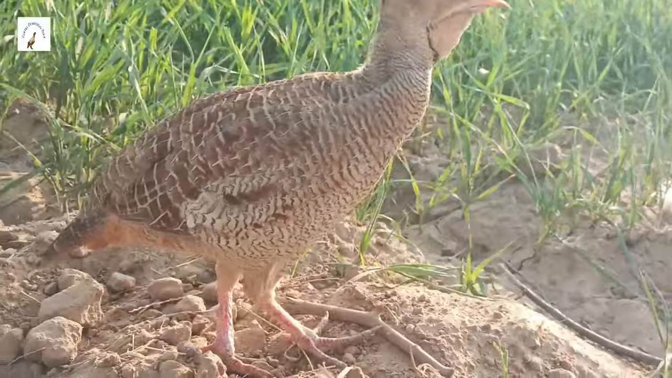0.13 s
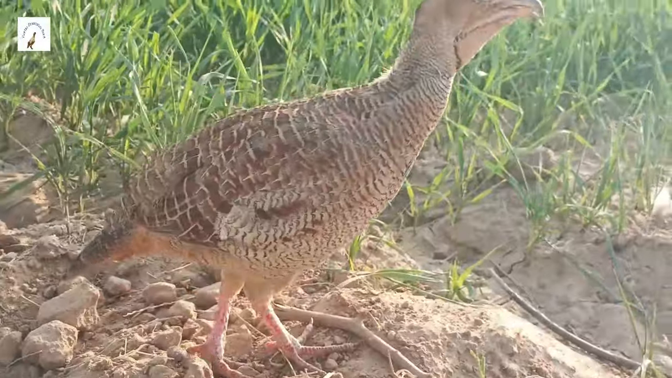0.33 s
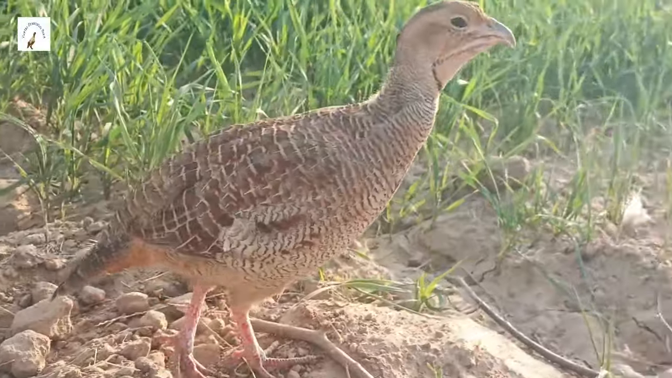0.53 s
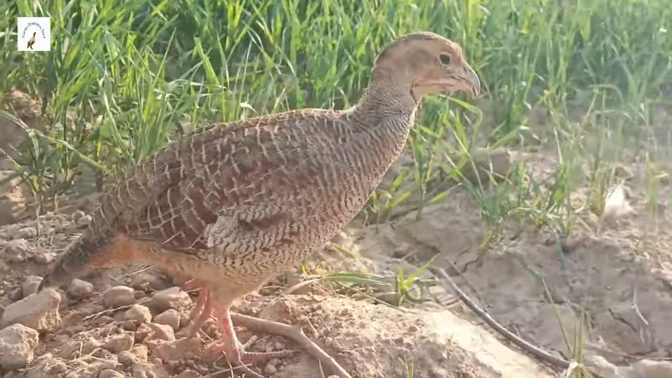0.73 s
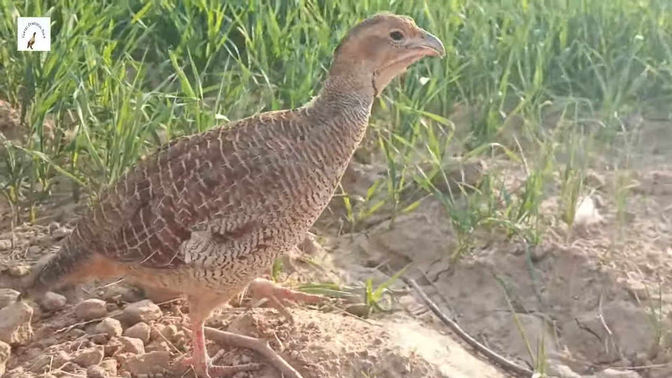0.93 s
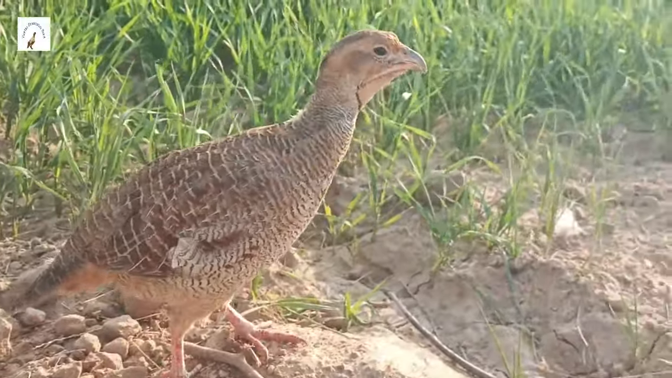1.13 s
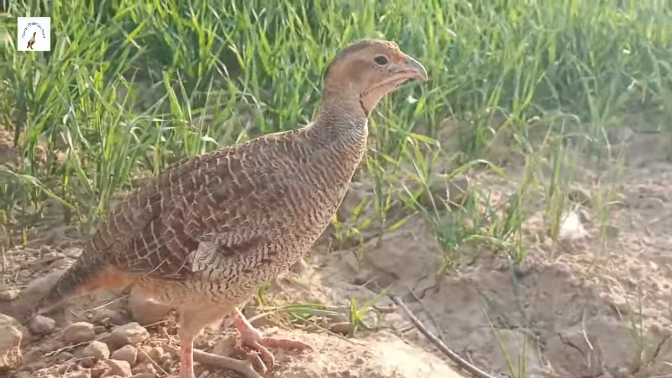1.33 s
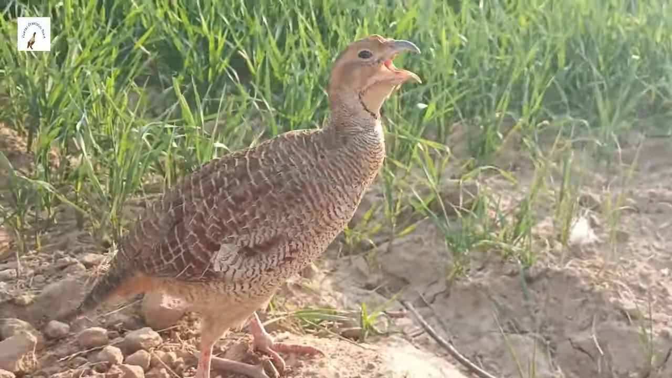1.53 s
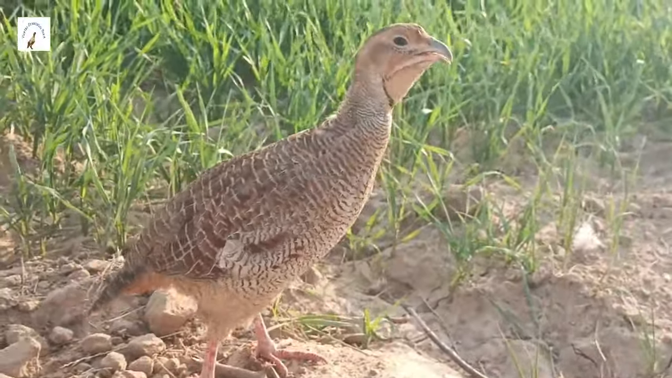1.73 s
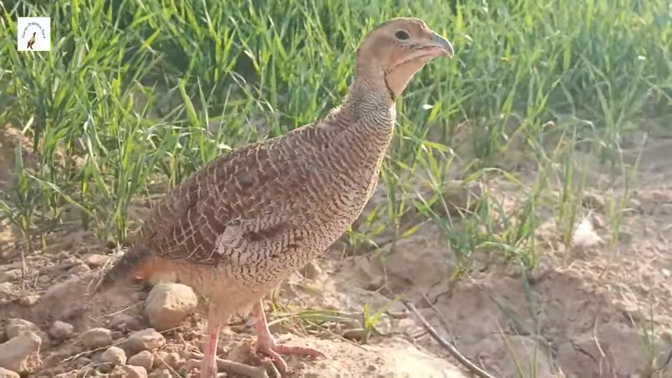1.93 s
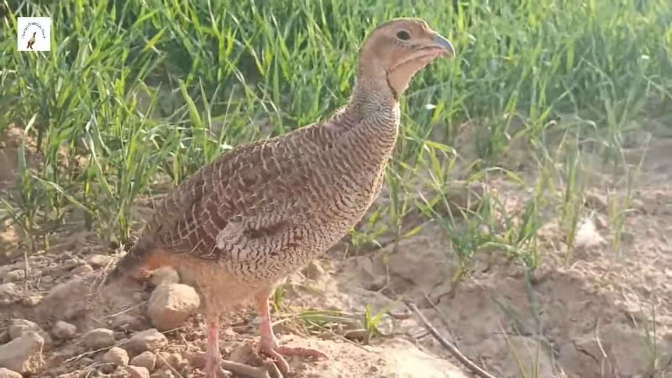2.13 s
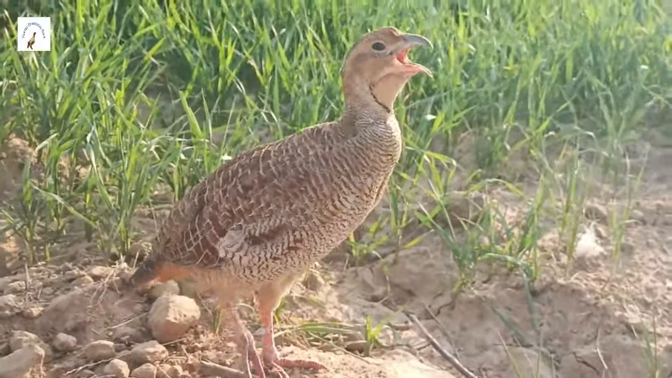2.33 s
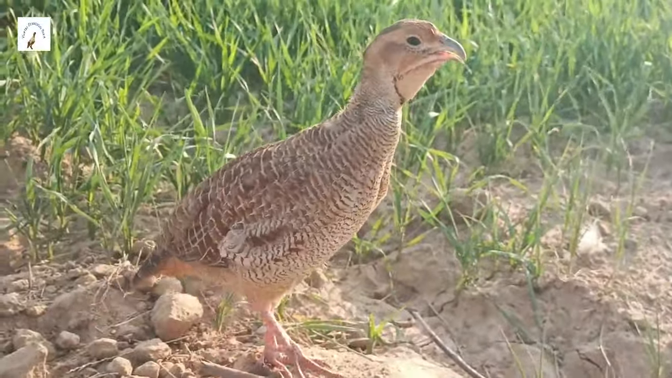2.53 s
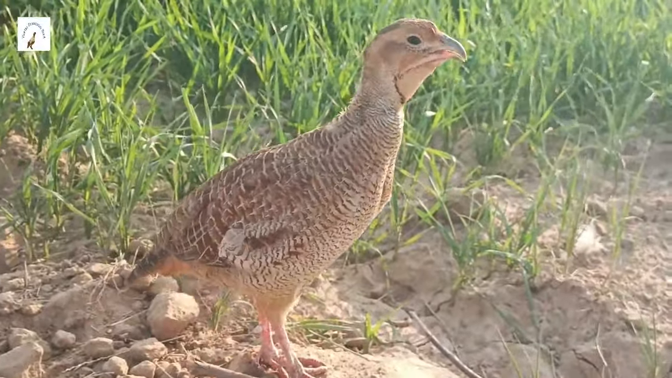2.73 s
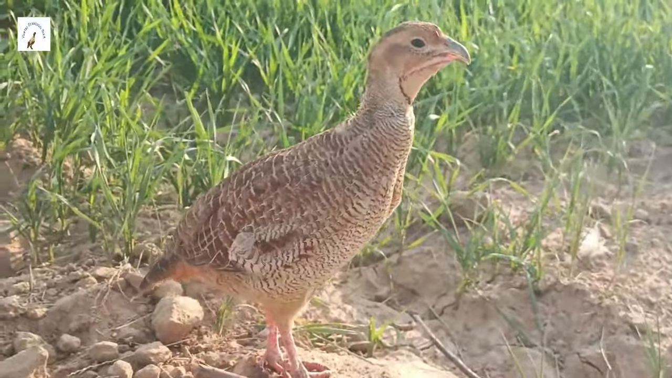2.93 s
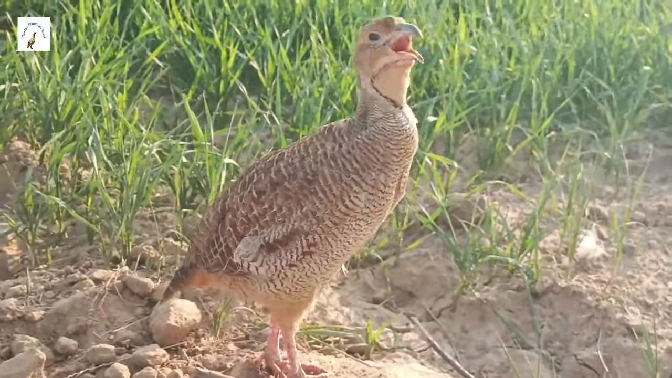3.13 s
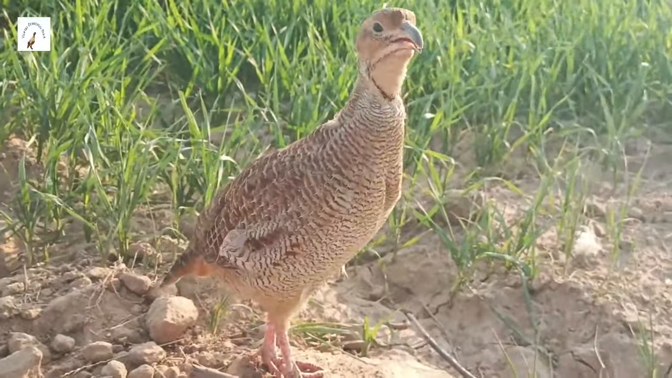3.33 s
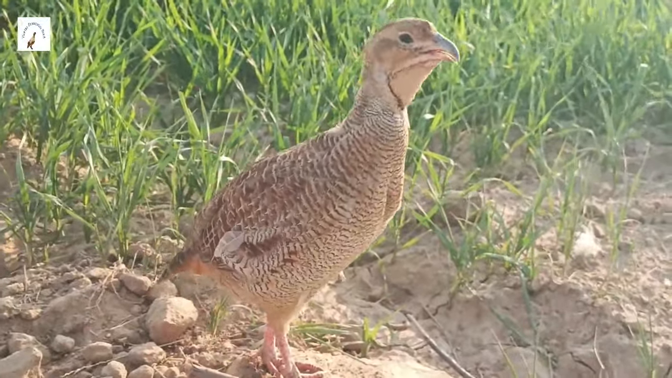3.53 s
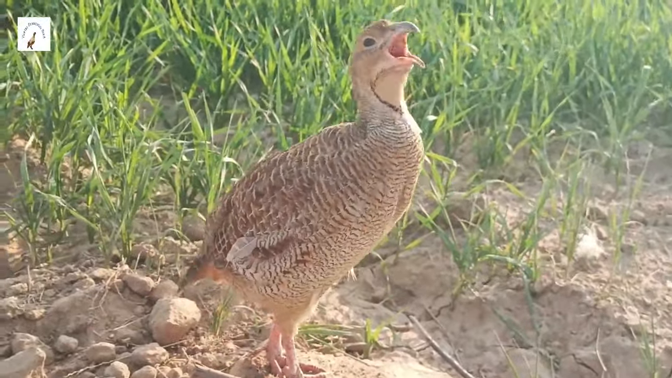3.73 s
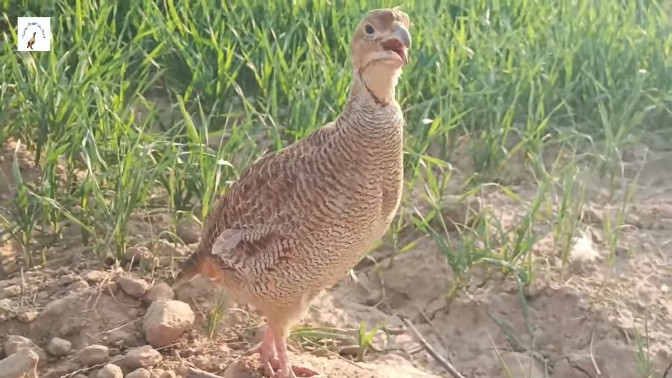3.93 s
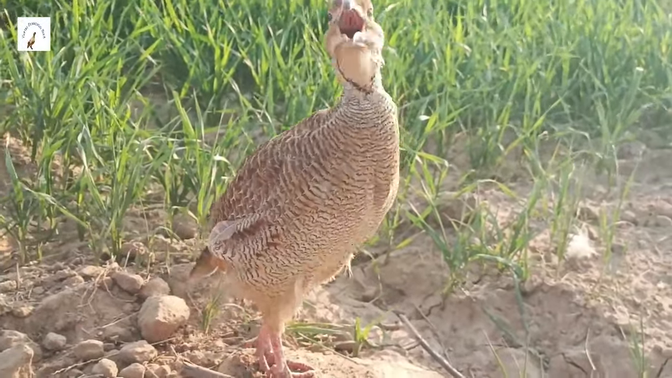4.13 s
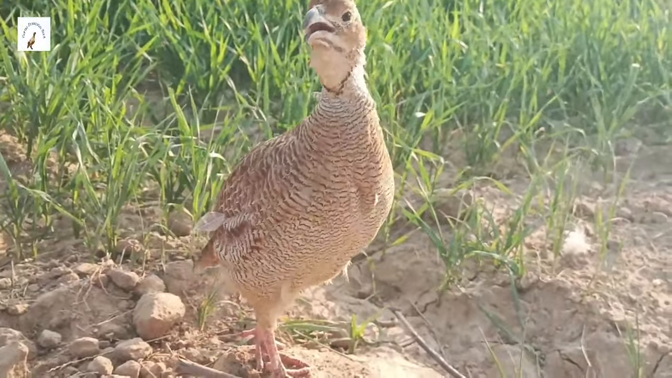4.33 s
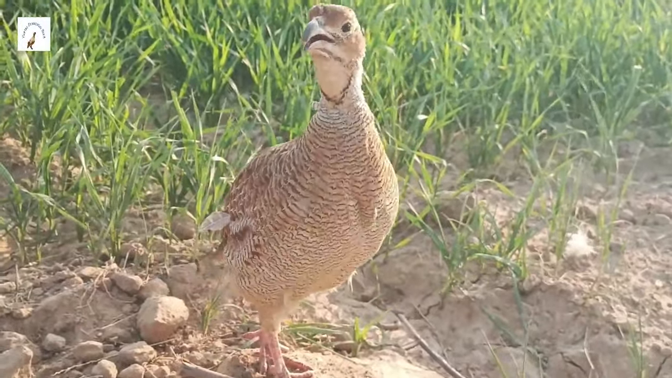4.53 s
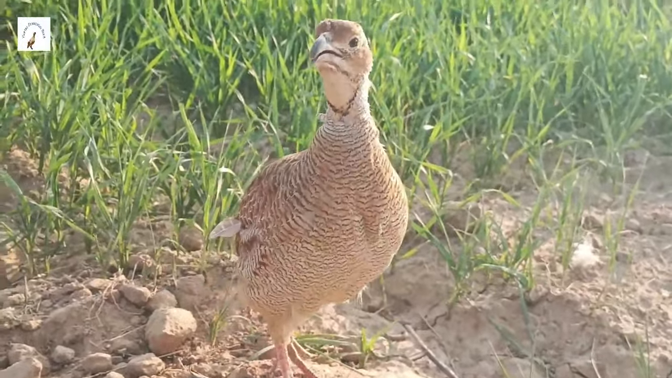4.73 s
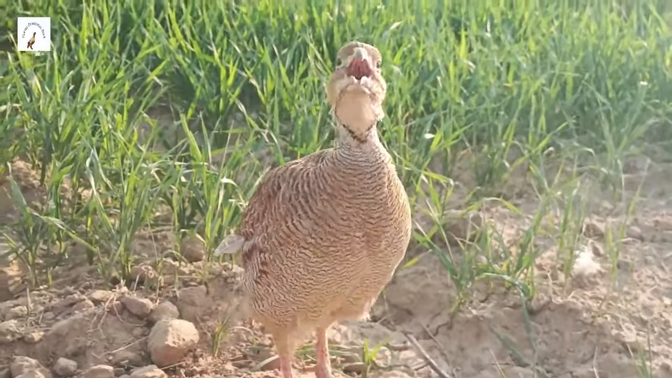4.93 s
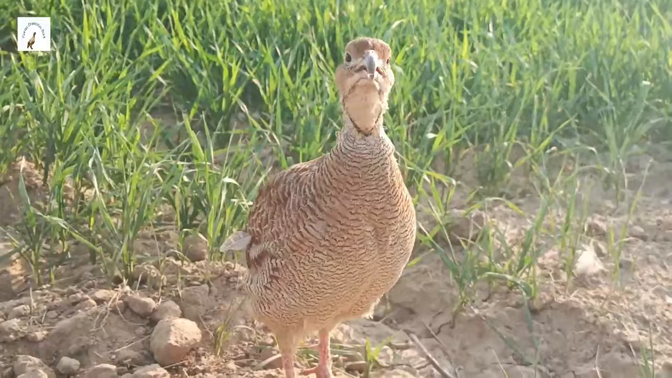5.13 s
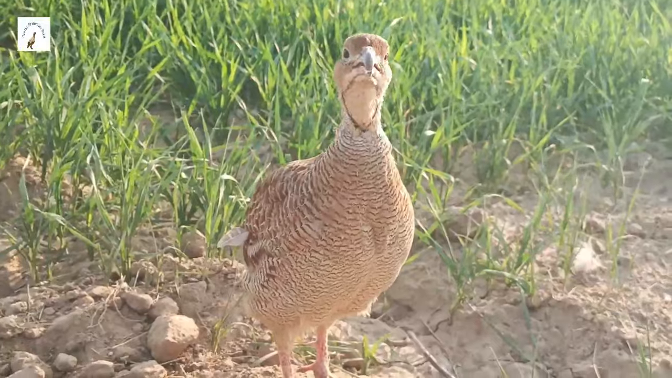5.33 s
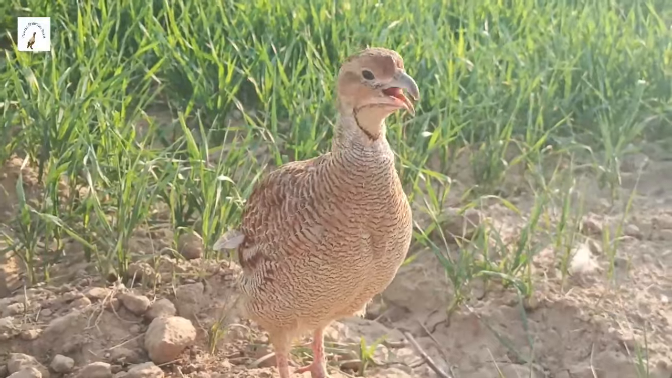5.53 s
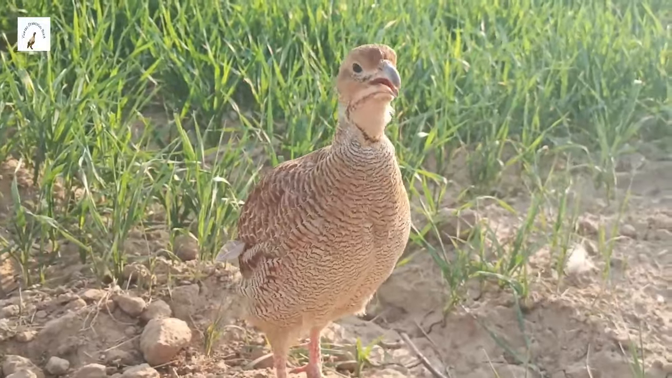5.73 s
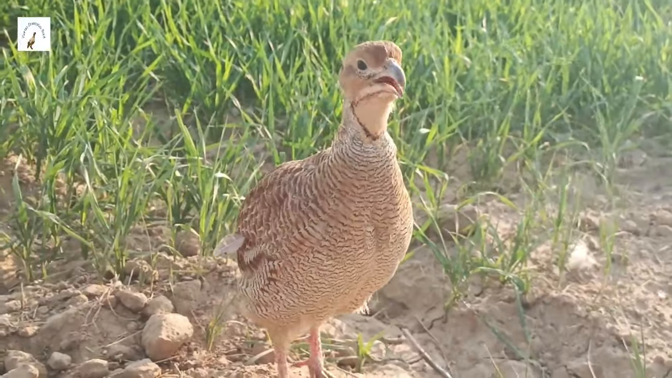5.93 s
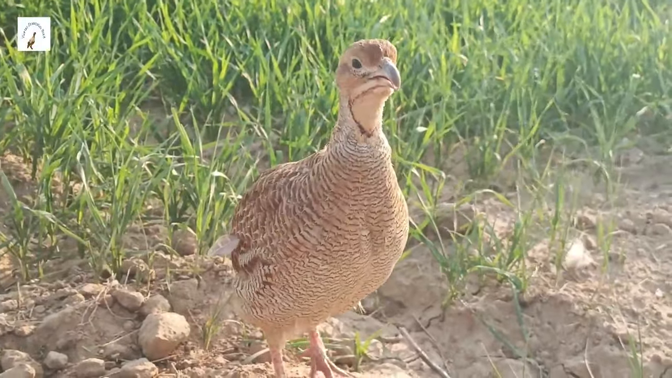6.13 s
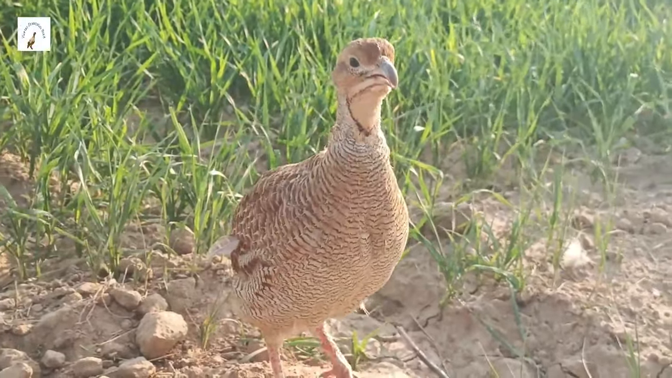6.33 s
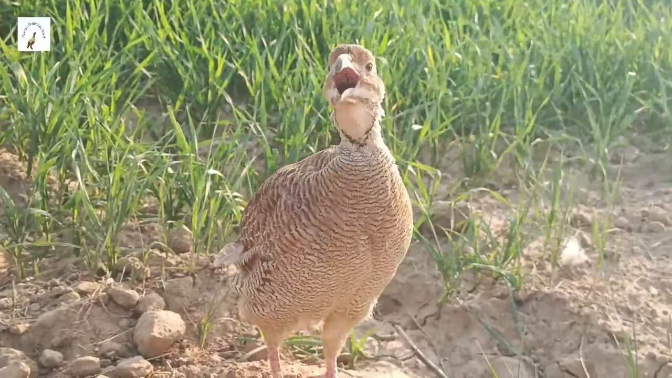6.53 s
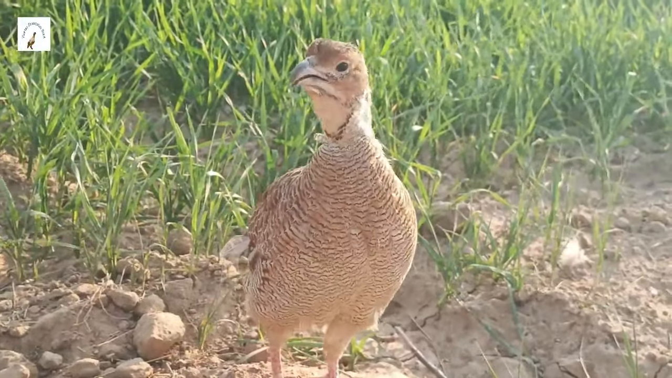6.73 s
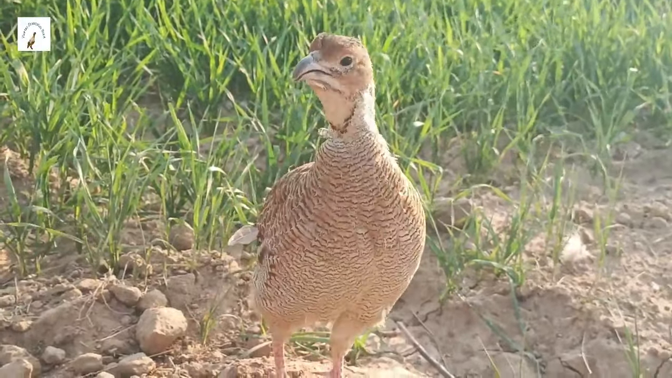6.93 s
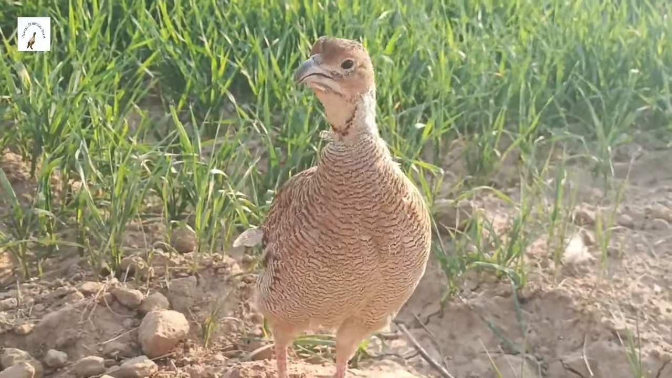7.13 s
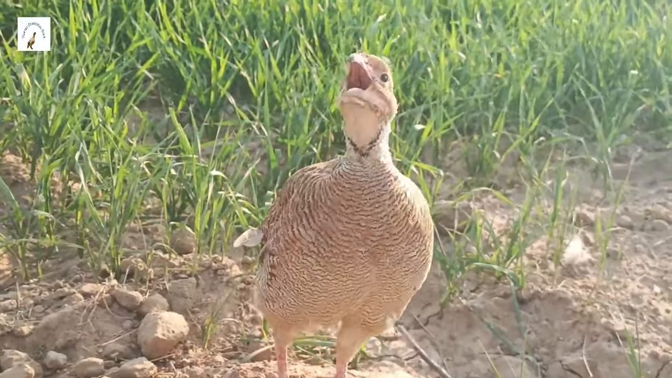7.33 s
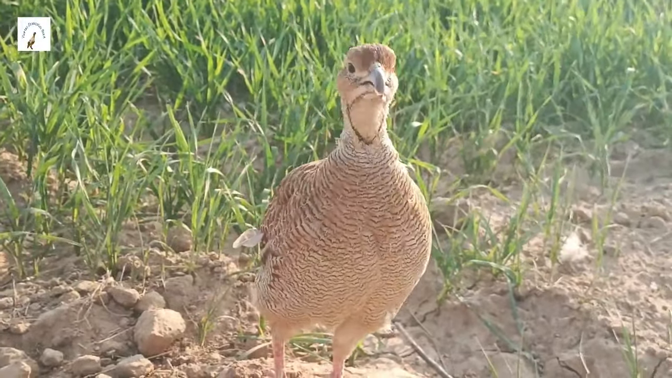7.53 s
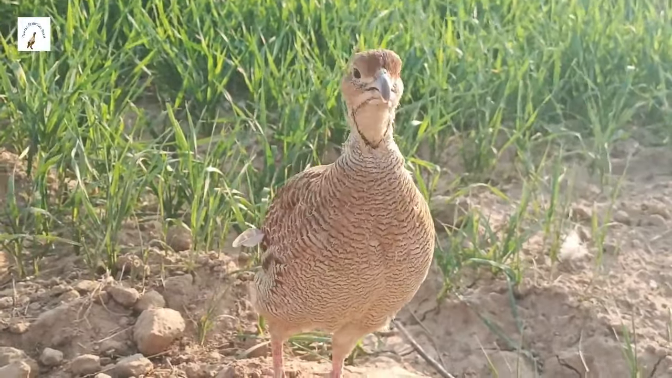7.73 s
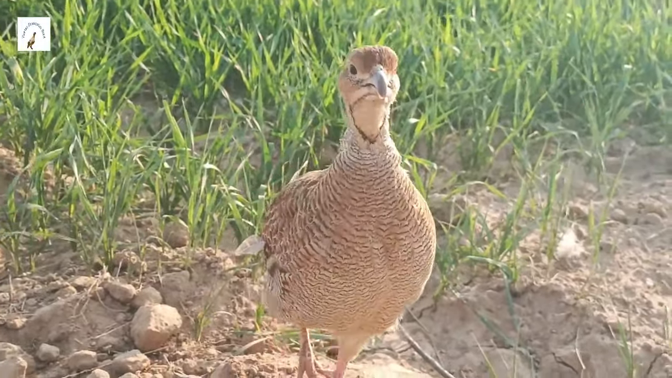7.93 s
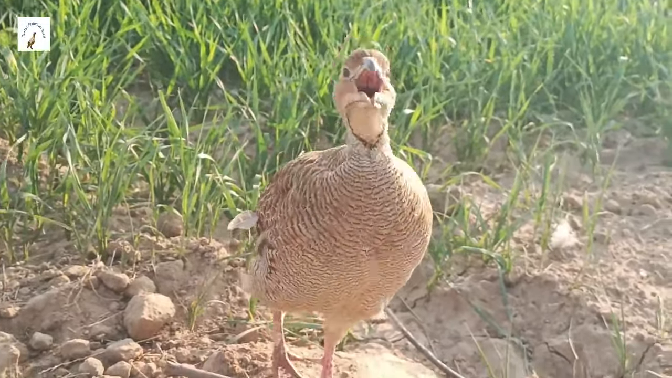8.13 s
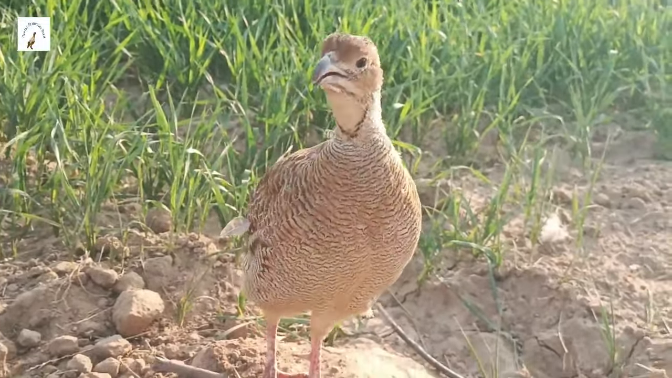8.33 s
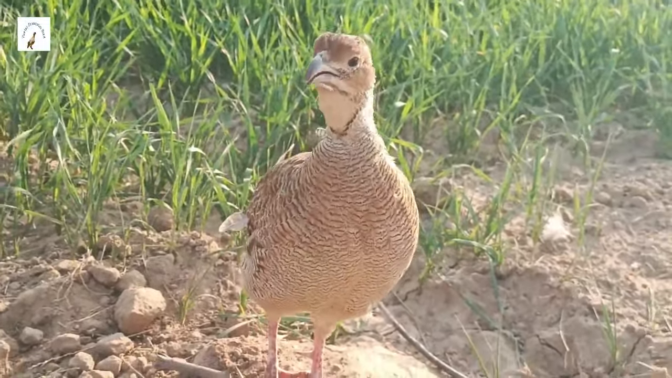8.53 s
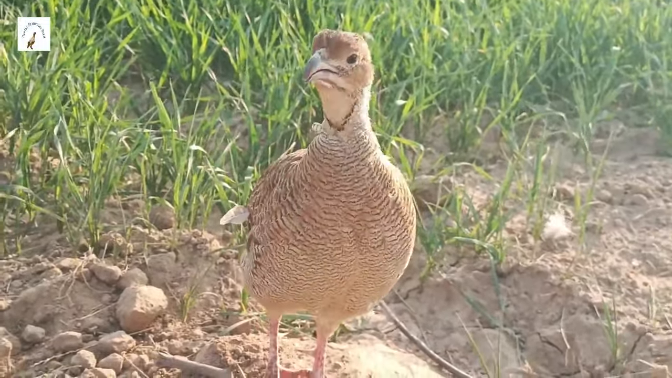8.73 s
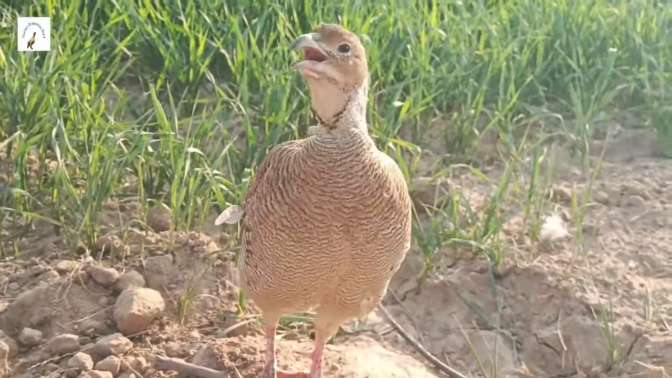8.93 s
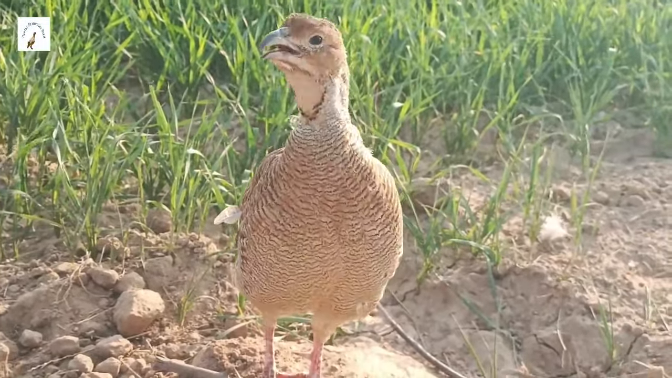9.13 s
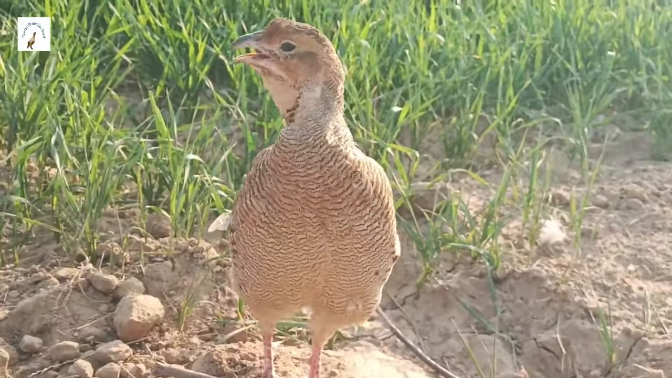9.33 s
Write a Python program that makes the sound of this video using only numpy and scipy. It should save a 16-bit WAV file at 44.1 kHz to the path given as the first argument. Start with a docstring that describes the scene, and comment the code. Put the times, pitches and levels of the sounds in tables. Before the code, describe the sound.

A near-instant of silence, then quiet open air with light low wind. At 0.1 s a brief whistle blip and rasp lead into a pip, a falling note and three hoarse clucks by 0.6 s. From 0.7 s the duet settles: a high, nearly pure whistle scoops up, sags and flicks upward, while a rougher bird gives rasp, pip, falling note and clucks. Cycles begin near 0.7, 1.4, 2.2 and 3.0 s, the falling notes turning clearer. Around 3.8 to 4.6 s the pattern tightens, with an extra cluck and a second rasping phrase. Further rounds start near 4.8, 5.6, 6.4, 7.3 and 8.1 s. Wind bumps come mainly from 2 to 3.6 s, with a stronger thump at 4.6 s; barely audible distant notes occur near 0.6 and 4.7 s. At 8.9 s a last whistle meets rasps, falling notes and a final pip near 9.3 s. Close and dry, with faint field reflections.

```python
"""After a very short silence, light wind is heard on open ground and one francolin whistles, high and nearly pure.
A second bird answers with a rasp, a pip and a falling note, then hoarse clucks, and the duet goes on.
Soon gusts, thumps and two faint distant notes join in, and the far field edge sends back a faint echo.
The whistle and clear notes are bending sine waves; rasps and clucks are uneven pulses ringing resonances.
Wind is coloured noise, thumps are short low waves, and the echo is a burst of noise used as a filter."""
import sys
import numpy as np
from scipy import signal
from scipy.fft import rfft, irfft
from scipy.io import wavfile
from scipy.ndimage import uniform_filter1d

SR = 44100
rng = np.random.default_rng(int(sys.argv[2]) if len(sys.argv) > 2 else 0)


def master(y):
    """Save y as 16-bit WAV."""
    cut = np.clip(np.atleast_2d(y).T, -1, 1)
    pcm = np.round(cut * 32767)  # scale
    wavfile.write(sys.argv[1], SR, pcm.astype(np.int16))


N = 413216

# Gusts: (middle t/s, length/s, level/dB before the lumps)
GUSTS = [(0.625, 0.35, -57.5), (1.299, 0.43, -55.5), (1.928, 0.32, -46.5), (2.257, 0.11, -42.5),
         (2.981, 0.33, -45.5), (3.521, .35, -38.5), (4.68, 0.36, -48.5), (5.5, 0.3, -54.5),
         (7.004, 0.31, -58.5), (8.7, 0.3, -59)]
# Colour of the wind noise: (f/Hz, level/dB)
WIND_COLOUR = [(25, -35), (60, -7.5), (110, -1), (190, -15), (300, -20), (600, -54), (1500, -95.5)]
# Thumps of wind on the microphone: (start t/s, level/dB, f/Hz)
THUMPS = [(1.988, -24.5, 140), (2.259, -31.5, 152), (3.029, -30.5, 115), (3.22, -37.5, 163),
          (3.52, -23.5, 115), (3.56, -23.5, 65), (4.62, -13, 120), (6.888, -35, 80.3), (7.16, -38, 97),
          (8.908, -29, 140)]
# Colour of the quiet air: (f/Hz, level/dB)
AIR_COLOUR = [(250, -18), (317, -3.5), (400, -12.5), (1740, -26), (6000, -42)]
# Faint calls of a distant bird: (t/s, length/s, first base f/Hz, base f/Hz it nears, level/dB)
DISTANT = [(.59, .07, 590, 610, -66), (4.74, .085, 520, 600, -58)]
# Overtones of the distant call: (multiple of the base pitch, level/dB)
DISTANT_OVERTONES = [(2, 0), (3, -5)]
# Clucks: (t/s, length scale/s, growl level/dB, treble trim/dB, windpipe f/Hz at full effort, clear note level/dB)
CLUCKS = [(0.337, 0.056, -11.5, -30.5, 1177, -9.5), (0.437, 0.049, -12.5, -35, 1213, -11),
          (0.544, .04, -19, -34, 1150, -27.5), (1.066, 0.053, -12.5, -32, 1252, -13),
          (1.167, 0.055, -12, -34, 1302, -12), (1.286, 0.029, -29.5, -45, 1160, -36.5),
          (1.781, 0.057, -10, -29, 1304, -7.5), (1.889, 0.055, -11, -32.5, 1305, -12),
          (2.01, 0.038, -26, -36, 1200, -27), (2.583, 0.059, -11, -26, 1394, -9.5),
          (2.688, 0.058, -11.5, -31, 1295, -11.5), (2.806, 0.047, -19, -34.5, 1240, -21.5),
          (3.375, 0.06, -11, -23.5, 1474, -10.5), (3.49, 0.057, -10, -28, 1281, -12),
          (3.611, 0.048, -12, -32.5, 1426, -16.5), (4.028, 0.046, -11.5, -11, 1543, -8.5),
          (4.4, 0.058, -10.5, -15.5, 1522, -7.5), (4.516, 0.057, -12, -17, 1440, -10.5),
          (4.636, 0.052, -10, -24, 1426, -28), (5.181, 0.058, -10.5, -17.5, 1467, -7.5),
          (5.295, .055, -9.5, -23, 1367, -16), (5.414, 0.052, -14.5, -32.5, 1245, -20.5),
          (5.922, .056, -12, -19.5, 1453, -9), (6.033, 0.053, -11.5, -21.5, 1312, -10.5),
          (6.153, 0.042, -14.5, -32.5, 1304, -19), (6.798, 0.056, -11, -20, 1347, -9.5),
          (6.909, 0.051, -9.5, -25.5, 1467, -19), (7.029, 0.043, -26.5, -41.5, 1205, -33),
          (7.642, 0.052, -12, -20, 1340, -9.5), (7.746, .055, -11.5, -26, 1330, -12.5),
          (7.869, 0.043, -21, -38, 1266, -27), (8.467, .057, -10.5, -19.5, 1377, -9),
          (8.578, 0.055, -11, -24.5, 1293, -10), (8.696, .049, -12, -29, 1355, -17)]
# Resonances of a cluck: (multiple of the windpipe pitch, added f/Hz, basic width/Hz, level/dB)
# The first four are the bass group, the rest the treble group.
PIPE = [(.26, 0, 220, -4.5), (1.0, 0, 380, 22.5), (0, 2800, 330, 9), (1.5, 0, 1100, -3), (0, 4100, 300, -3),
        (0, 5500, 260, -1), (0, 4300, 3200, -16), (0, 9300, 4000, -27)]
# Colour the beak gives to the clucks: (f/Hz, level/dB)
CLUCK_BEAK = [(120, -30), (300, -2), (700, -4), (1300, 0), (2000, 0), (3400, 4), (4800, -1), (5800, 4),
              (6500, -10), (9000, -2), (16000, 8)]
# Colour of the open beak in harsh sounds: (f/Hz, level/dB)
OPEN_BEAK = [(200, -38), (1000, -19), (1500, -14), (2100, -6.5), (2350, -13), (2750, -4), (3300, -1),
             (4000, -16), (4600, -12), (5600, -8), (6200, -20), (7200, -38), (8200, -25), (10500, -24.5),
             (16000, -41)]
# Colour of the beak in clear notes: (f/Hz, level/dB)
SUNG_BEAK = [(900, -1), (2000, 2.5), (3900, -1), (5900, -1), (6700, -14), (7600, -25), (9600, -19),
             (16000, -37.5)]
# Rasps that open a phrase: (t/s, length/s, top level/dB before the lumps)
RASPS = [(0.12, 0.055, -25.5), (0.864, 0.048, -11), (1.569, 0.051, -10), (2.349, 0.043, -9),
         (3.131, 0.036, -14), (3.769, 0.04, -11.5), (4.149, 0.042, -10.5), (4.944, 0.027, -10.5),
         (5.687, 0.034, -10), (6.56, 0.036, -10.5), (7.412, 0.035, -10.5), (8.217, 0.039, -13),
         (8.917, 0.047, -11), (9.143, 0.054, -9), (9.288, .034, -10.5)]
# Pips: (t/s, length/s without its edges, f/Hz, starting level/dB)
PIPS = [(0.18, 0.012, 1782, -18), (.921, 0.011, 1830, -13.5), (1.625, 0.012, 1892, -14.5),
        (2.4, 0.02, 1898, -14.5), (3.178, 0.02, 1925, -13.5), (3.819, 0.017, 1949, -13.5),
        (4.195, 0.017, 2025, -13.5), (4.985, 0.019, 1957, -12.5), (5.73, 0.022, 1946, -13.5),
        (6.604, .024, 1930, -14), (7.456, 0.019, 1939, -13.5), (8.264, .021, 1940, -14),
        (8.969, 0.021, 1967, -17), (9.334, 0.017, 2036, -12.5)]
# Falling notes: (t/s, length/s, first f/Hz, last f/Hz, first level/dB, fade/dB, hoarseness against the tone/dB)
FALLS = [(0.215, 0.057, 1704, 1051, -22.5, -11, 8.5), (0.954, .053, 2040, 1173, -27, -9.5, 11.5),
         (1.658, 0.062, 2073, 1112, -22, -12.5, 9.5), (2.444, 0.053, 1874, 1352, -10, -14.5, -31),
         (3.221, 0.06, 1946, 1460, -10.5, -11, -24.5), (3.866, .054, 1942, 1460, -15.5, -8.5, -20),
         (4.241, 0.071, 1983, 1469, -9, -14.5, -26.5), (5.033, 0.057, 1980, 1469, -9, -14, -25.5),
         (5.777, 0.06, 1964, 1412, -12.5, -10.5, -16), (6.653, 0.057, 1883, 1479, -13, -6.5, -16),
         (7.503, 0.053, 1960, 1318, -10.5, -14.5, -26), (8.311, 0.063, 1987, 1443, -10.5, -13, -23),
         (9.02, 0.05, 1802, 1383, -16.5, -7.5, -9), (9.197, 0.065, 2510, 2290, -10.5, -8.5, -31.5)]
# Whistles: (t/s, length/s, pitch before its bends f/Hz, sag/Hz, closing flick/Hz, level/dB before tuning)
WHISTLES = [(0.094, 0.031, 3900, 5, 350, -22.5), (0.715, .14, 3784, 9, 323, -5.5),
            (1.431, .14, 3773, 73, 380, -5), (2.212, 0.14, 3799, 157.5, 407, -5),
            (3.014, 0.14, 3830, 89, 283, -6), (3.844, .14, 3874, -23.5, 557, -10.5),
            (4.826, .13, 3877, 171.5, 150.6, -5.5), (5.561, 0.13, 3867, 142.5, 102.5, -5.5),
            (6.433, .148, 3970, 236, 211.4, -5), (7.275, .15, 3798, 81, 300, -5.5),
            (8.093, .14, 3810, 142, 173.6, -5), (8.917, 0.1672, 3746, 166.5, 498, -12)]
# Breathy bands beside the whistle: (multiple of its pitch, width/Hz, level against the whistle/dB)
WHISTLE_AIR = [(.5, 205, -45), (.74, 144.7, -48.5), (1.052, 688, -29), (2.1, 2200, -39),
               (3.102, 2836, -45.5)]
# Throat tuning, loudest where the throat fits the whistle: (whistle f/Hz, level/dB)
THROAT_TUNING = [(3400, -6.5), (3620, -3), (3760, -1.5), (3870, -1.5), (3990, -8.5)]

# wind
AIR_DB, LUMPS_DB, THUMP_S = -63, 4, .0055
# clucks: where the clear note peaks (share of the length), its rise and tail, its sinking (share per second)
NOTE_AT, NOTE_RISE_S, NOTE_TAIL_S, NOTE_SAG_PER_S = .55, .005, .017, 4.5
TAIL_PER_DB = .3  # the clearer the note, the longer it rings (dB of length per dB)
PIPE_RISE_PER_DB = .0183  # the windpipe pitch climbs with effort (share per dB)
EFFORT_TILT = .08  # each octave up the windpipe follows the effort this much more
JITTER_SOFT, JITTER_PER_DB = .03, .0045  # soft clucks pulse evenly, loud ones break up
WIDEN_PER_DB, DRIFT = .14, .03  # loud clucks ring more broadly; the pitch wavers by this share
# phrases
RASP_JITTER, ROUGH_HISS, RASP_LUMPS_DB = .1, .25, 1.6
UNEVEN_DB, UNEVEN_HZ = 1.6, 90  # how much and how fast the overtones of a clear note waver
HUM_DB, HUM_DETUNE_DB = -17, 5  # hum before a pip: level against the pip, loss off tuning
BREATH_DB, CRACK_DB = -22, -11  # rasp under a pip; crack against the top of a falling note
FALL_BEND, FADE_BEND = 1.5, 1.1  # pitch and level drop faster towards the end
HOARSE_BEND = .6  # a very hoarse note drops quickly, then lingers low
# whistle: a quick scoop up, a slow climb, a sag between two shares of its length, a flick up
SCOOP_HZ, SCOOP_S, CLIMB_HZ, CLIMB_S = 310, .005, 228.6, .03
SAG_FROM, SAG_TO, FLICK_S = .4, .85, .011
SWING_DB, SWING_S = 2.5, .012  # the level swings as it starts, then settles
SECOND_VOICE_HZ, UNDERTONE_DB, MIRROR_DB, MIRROR_S = 3924, -41, -18.5, .0061
# finish
START_S, CEILING, EDGE_HZ = .0865, .95, 16200


def amp(db):
    """Turns decibels into gain."""
    return 10 ** (np.asarray(db) / 20)


def evened(x):
    """Scales a sound to an average strength (rms) of 1."""
    return x / np.sqrt(np.mean(x ** 2) + 1e-20)


def read(points, hz):
    """Reads a colour table at any pitch, on a log-frequency axis."""
    f, db = np.transpose(points)
    return np.interp(np.log(hz + 1), np.log(f + 1), db)


def coloured(x, points):
    """Filters by a colour table, the treble a little late so that clicks smear; rms 1."""
    hz = np.fft.rfftfreq(len(x), 1 / SR)
    smear = np.exp(-1j * np.pi * hz ** 2 * .001 / 4000)
    return evened(irfft(rfft(x) * smear * amp(read(points, hz)), len(x)))


def add(mix, s, sound):
    """Mixes a sound in at time s, cutting what runs past the end."""
    part = mix[round(s * SR):][:len(sound)]
    part += sound[:len(part)]


def curve(rows):
    """Draws straight lines between rows of (time, values) and samples each column."""
    s, *columns = np.transpose(rows)
    t = np.arange(s[0], s[-1], 1 / SR)
    return [np.interp(t, s, c) for c in columns]


def wobble(count, hz):
    """Makes a smooth random curve that changes about hz times a second."""
    size = max(int(SR / hz), 1)
    noise = rng.standard_normal(count + 2 * size)
    return evened(uniform_filter1d(uniform_filter1d(noise, size), size))[:count]


def resonate(x, hz, width):
    """Shifts hz down to zero, smooths twice and shifts back: a steep resonance."""
    turn = np.exp(2j * np.pi * np.cumsum(hz * np.ones(len(x))) / SR)
    r = np.exp(-np.pi * width / SR)
    return 2 * (turn * signal.lfilter([(1 - r) ** 2], [1, -2 * r, r * r], x / turn)).real


def wind():
    """Lumpy gusts of low noise and single thumps on the microphone, over the quiet air of the field."""
    t = np.arange(N) / SR
    gusts = amp(-68) + sum(amp(db) * np.exp(-(2.4 * (t - s) / length) ** 2) for s, length, db in GUSTS)
    out = gusts * amp(LUMPS_DB * wobble(N, 24)) * coloured(rng.standard_normal(N), WIND_COLOUR)
    u = np.arange(0, 5, 1 / (SR * THUMP_S))  # time counted in thump widths
    for s, db, hz in THUMPS:
        add(out, s, amp(db) * np.exp(-(u - 2) ** 2) * np.sin(2 * np.pi * hz * THUMP_S * u))
    return out + amp(AIR_DB) * coloured(rng.standard_normal(N), AIR_COLOUR)


def distant():
    """A thin rising note from far across the field, made of overtones without their base pitch."""
    out = np.zeros(N)
    for s, length, first_hz, last_hz, db in DISTANT:
        share = np.arange(0, length, 1 / SR) / length
        hz = last_hz + (first_hz - last_hz) * np.exp(-4 * share)
        phase = 2 * np.pi * np.cumsum(hz) / SR
        sound = sum(amp(g) * np.cos(k * phase) for k, g in DISTANT_OVERTONES)
        add(out, s, amp(db) * sound * signal.windows.tukey(len(share), .5))
    return out


def field(x):
    """Short scatter from ground and stalks, and one dull echo from the far edge after 0.15 s."""
    t = np.arange(SR // 4) / SR
    scatter = coloured(rng.standard_normal(len(t)), [(700, -18.0), (1800, 4), (3500, -18.5)])
    near = scatter * amp(-60 * t / .059) * (t > .002)
    far = scatter * np.exp(-((t - .15) / .0008) ** 2)
    taps = amp(-28.0) * near / np.linalg.norm(near) + amp(-56.0) * far / np.linalg.norm(far)
    return signal.fftconvolve(x, taps)[:N]


def pulses(hz, jitter, shimmer_db, hiss):
    """Uneven closures of the syrinx (voice organ) membranes, with air noise leaking between them."""
    turns = np.cumsum(hz * np.exp(jitter * wobble(len(hz), 900))) / SR
    clicks = np.diff(np.floor(turns), prepend=0) * amp(shimmer_db * rng.standard_normal(len(hz)))
    return evened(clicks) + hiss * rng.standard_normal(len(hz))


def clucks():
    """A growl of pulses rings the windpipe; for a moment it clears into a short sinking note."""
    out = np.zeros(N)
    for s, length, db, treble_db, hz, note_db in CLUCKS:
        # pulses per second and effort in dB: both swell to the middle, then fall
        rate, swell_db = curve([
            (0, 300, -24), (.08 * length, 300, -16), (.25 * length, 400, -9), (.5 * length, 500, 0),
            (.8 * length, 450, -6), (1.08 * length, 410, -18), (1.25 * length, 380, -38)])
        jitter = JITTER_SOFT + JITTER_PER_DB * max(db + 26, 0)
        drive = pulses(rate, jitter, shimmer_db=3.0, hiss=.13)
        drive_centred = drive - drive.mean()
        drift = DRIFT * wobble(len(rate), 270)
        widen = amp(WIDEN_PER_DB * (db + 27.5))
        rings = []
        for n, (k, fixed_hz, width, g) in enumerate(PIPE):
            ring_hz = k * hz * (1 + PIPE_RISE_PER_DB * swell_db) + (k * hz + fixed_hz) * drift + fixed_hz
            gain = amp(g + EFFORT_TILT * swell_db * np.log2(1 + k + fixed_hz / hz))
            rings.append((-1) ** n * gain * resonate(drive_centred, ring_hz, width * widen))
        # the treble needs more effort than the bass, so it comes later and leaves sooner
        treble = amp(treble_db + 13.0 + .6 * swell_db) * evened(sum(rings[4:]))
        body = coloured(evened(sum(rings[:4])) + treble, CLUCK_BEAK)

        t = np.arange(len(rate)) / SR - NOTE_AT * length  # zero at the peak of the clear note
        tail_s = NOTE_TAIL_S * amp(TAIL_PER_DB * (note_db - db))
        note_shape = np.exp(-abs(t / np.where(t > 0, tail_s, NOTE_RISE_S)) ** 3)
        phase = 2 * np.pi * np.cumsum(hz * (1 - NOTE_SAG_PER_S * t)) / SR
        overtones = sum(amp(.83 * treble_db - 3.1 * k) * np.cos(k * phase + k * k) for k in range(2, 5))
        note = np.cos(phase) + (1.4 + .5 * wobble(len(rate), 710)) * overtones
        # the growl gives way where the note is clear
        clear = np.clip(amp(2.9 * (note_db - db - 4.0)), 0, .9) * note_shape
        sound = amp(db + swell_db) * body * (1 - clear) + np.sqrt(2) * amp(note_db) * note * note_shape
        add(out, s, sound * signal.windows.tukey(len(rate), .18))
    return out


def tone(hz, db, detune_db):
    """A clear note of harmonics shaped by the beak; its overtones fade as it leaves the throat tuning."""
    phase = 2 * np.pi * np.cumsum(hz * (1 + .0075 * wobble(len(hz), 200))) / SR
    fade_db = detune_db * abs(np.log(hz / 1960))
    total = 0
    for k in range(1, 13):
        beak_db = read(SUNG_BEAK, k * hz) - read(SUNG_BEAK, hz)
        uneven_db = min(k - 1, 2) * UNEVEN_DB * wobble(len(hz), UNEVEN_HZ)
        # off tuning, the first harmonic gains a little while the others fade
        gain = amp(beak_db - (k - 1.5) * fade_db + uneven_db) * (k * hz < EDGE_HZ)
        total = total + gain * np.cos(k * phase + .74 * (k - 1) ** 2)
    return np.sqrt(2) * amp(db) * total * signal.windows.tukey(len(hz), min(400 / len(hz), 1))


def harsh(hz, db):
    """The same voice gone chaotic: uneven, lumpy pulses through the open beak."""
    rough = coloured(pulses(hz, jitter=RASP_JITTER, shimmer_db=3.0, hiss=ROUGH_HISS), OPEN_BEAK)
    level = amp(db + RASP_LUMPS_DB * wobble(len(hz), 400))
    lumpy = evened(rough * amp(RASP_LUMPS_DB * wobble(len(hz), 150)))
    return level * lumpy * signal.windows.tukey(len(hz), .5)


def croak(hz, db, width):
    """Slower pulses ring the half-closed throat at hz and its multiples."""
    drive = pulses(hz / 2.6, jitter=.17, shimmer_db=0.0, hiss=.49)
    total = 0
    for k, g in [(1, -3.5), (2, -8), (3, -12.0), (4, -19.0)]:
        # the higher rings die away faster as the level drops
        total = total + amp(g + .9 * (k - 1) * (db - db.max())) * resonate(drive, k * hz, width)
    return amp(db) * evened(total) * signal.windows.tukey(len(hz), .5)


def rasps(out):
    """Adds the chaotic voice that swells and dies to open each phrase."""
    for s, length, db in RASPS:
        add(out, s, harsh(*curve([
            (0, 1000, db - 11.0), (.12 * length, 1150, db - 4.5),
            (.49 * length, 1200, db), (length, 1050, db - 8)])))


def pips(out):
    """Adds pips: the voice hums near half pitch, cracks, locks on the pip and breaks up again."""
    for s, length, hz, db in PIPS:
        hum_db = db + HUM_DB
        hum = curve([(0, .47 * hz, hum_db - 8), (.012, .5 * hz, hum_db - 3), (.03, .52 * hz, hum_db - 3)])
        add(out, s - .03, tone(*hum, detune_db=HUM_DETUNE_DB))
        crack = curve([(0, hz / 2, db - 24.5), (.018, hz / 2, db - 14),
                       (.028, hz / 2, db + 2.5), (.033, hz / 2, db - 6.5)])
        add(out, s - .028, harsh(*crack))
        pip = curve([(0, .67 * hz, db - 26), (.005, hz, db),
                     (length + .0023, hz, db + 3.5), (length + .0052, .93 * hz, db - 9.0)])
        add(out, s - .003, tone(*pip, detune_db=14.5))
        breath = curve([(0, hz / 2, db + BREATH_DB), (length + .0063, hz / 2, db + BREATH_DB)])
        add(out, s, harsh(*breath))
        breakup = curve([(0, hz, db - 23.5), (.004, hz, db - 1.5), (.016, hz, db - 15), (.034, hz, db - 28.5)])
        add(out, s + length - .002, croak(*breakup, width=570))


def falling_notes(out):
    """Adds sinking notes, part clear and part hoarse, opened by a crack and closed by a croak."""
    for s, length, first_hz, end_hz, level_db, fade_db, hoarse_db in FALLS:
        share = np.arange(0, length, 1 / SR) / length
        bend = FALL_BEND if hoarse_db < 0 else HOARSE_BEND
        hz = first_hz + (end_hz - first_hz) * share ** bend
        db = level_db + fade_db * share ** FADE_BEND
        clear = 1 / (1 + amp(hoarse_db) ** 2)
        hoarse = croak(hz, db + hoarse_db, width=460)
        rough = harsh(hz / 2, db + min(hoarse_db, -14) - 6)
        add(out, s, clear * tone(hz, db, detune_db=31.0) + hoarse + rough)
        crack_db = db.max() + CRACK_DB
        crack = curve([(0, 1001, crack_db - 2.5), (.008, 995, crack_db), (.018, 1000, crack_db - 1)])
        add(out, s - .007, harsh(*crack))
        croak_db = db.max() + min(hoarse_db, -24) + 15.0
        closing = curve([(0, end_hz, croak_db - 8.5), (.01, end_hz, croak_db),
                         (.02, end_hz, croak_db - 7.5), (.034, .76 * end_hz, croak_db - 24)])
        add(out, s + length - .006, croak(*closing, width=510))


def phrases():
    """The answering bird's voice turns from rasp to hum, pip and falling note."""
    out = np.zeros(N)
    rasps(out)
    pips(out)
    falling_notes(out)
    return out


def whistler():
    """A nearly pure bending whistle with faint air bands; a tiny rising blip leads into each."""
    out = np.zeros(N)
    for s, length, top_hz, sag_hz, flick_hz, db in WHISTLES:
        t = np.arange(0, length, 1 / SR)
        sag = np.sin(np.pi / 2 * np.clip((t / length - SAG_FROM) / (SAG_TO - SAG_FROM), 0, 1)) ** 2
        rise_hz = SCOOP_HZ * np.exp(-t / SCOOP_S) + CLIMB_HZ * np.exp(-t / CLIMB_S)
        held_hz = top_hz - rise_hz - sag_hz * sag
        hz = held_hz + flick_hz * np.exp((t - length) / FLICK_S)
        phase = 2 * np.pi * np.cumsum(hz * (1 + .0017 * wobble(len(t), 150))) / SR
        swing_db = SWING_DB * np.sin(np.pi * t / SWING_S - 1) * np.exp(-t / (2 * SWING_S))
        pure = np.sqrt(2) * (np.cos(phase) + amp(-36) * np.cos(2 * phase))
        sound = pure * amp(.6 * wobble(len(hz), 120) + swing_db)
        # a steady second vibration beats with the whistle: a low undertone and a brief mirrored pitch
        second = 2 * np.pi * SECOND_VOICE_HZ * t
        sound += amp(UNDERTONE_DB) * np.cos(second - phase)
        sound += amp(MIRROR_DB) * np.exp(-t / MIRROR_S) * np.cos(2 * second - phase)
        noise = rng.standard_normal(len(hz))
        sound += sum(amp(g) * evened(resonate(noise, k * hz, width)) for k, width, g in WHISTLE_AIR)
        edges = signal.windows.tukey(len(hz), min(800 / len(hz), 1))
        add(out, s, amp(db + read(THROAT_TUNING, held_hz)) * sound * edges)
        blip_hz = np.linspace(3400, 4600, 1100)
        blip = np.cos(2 * np.pi * np.cumsum(blip_hz) / SR) + .37 * evened(resonate(noise[:1100], 3500, 450))
        blip_shape = signal.windows.tukey(1100, .5) * amp(np.linspace(3, -9, 1100))
        add(out, s - .013, amp(db - 20) * blip * blip_shape)
    return out


def scene():
    """Adds up both birds, their surroundings and the wind."""
    birds = whistler() + phrases() + clucks()
    return (birds + field(birds) + distant() + wind())[None]


def record(dry):
    """Fades in after a short silence, rounds off the loudest peaks, then removes the highest treble."""
    opened = dry * np.clip((np.arange(N) / SR - START_S) / .026, 0, 1)
    rounded = opened / (1 + abs(opened / CEILING) ** 6) ** (1 / 6)
    low_pass = signal.firwin(511, EDGE_HZ, window=("kaiser", 9), fs=SR)
    return signal.oaconvolve(rounded, low_pass[None], "same")


dry = scene()
out = record(dry)
master(out)
```